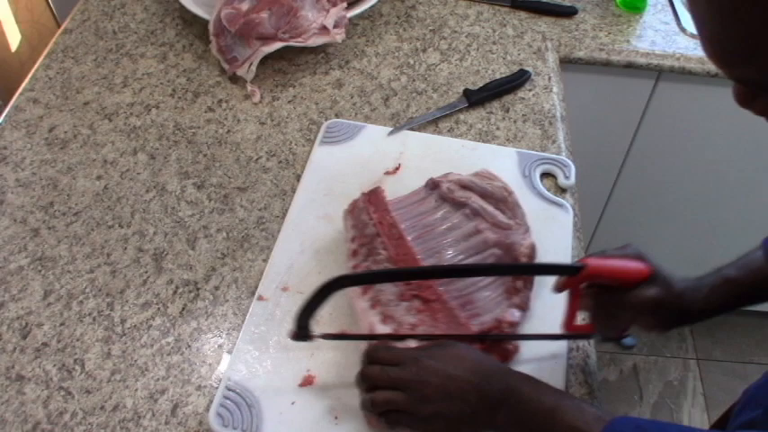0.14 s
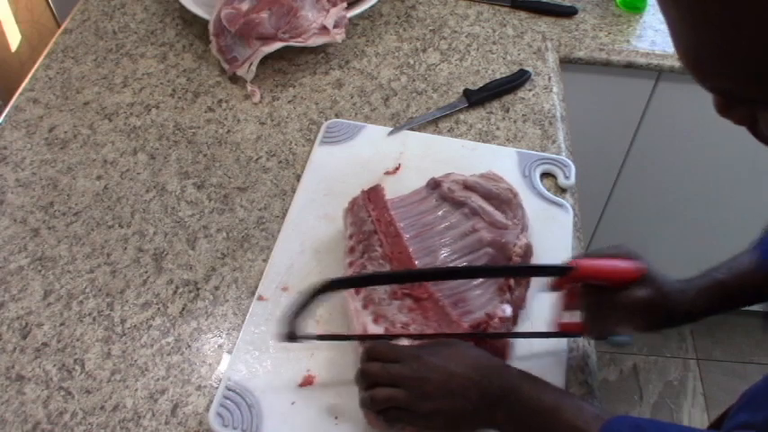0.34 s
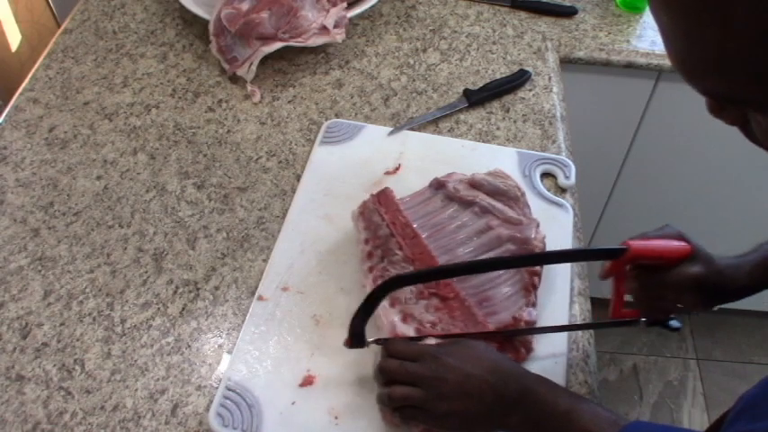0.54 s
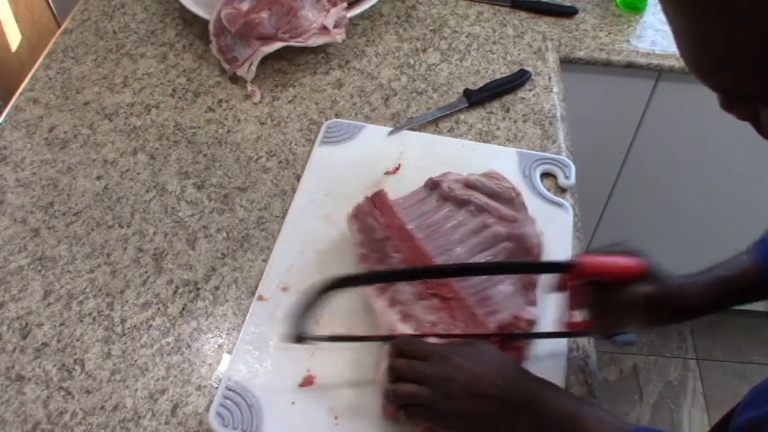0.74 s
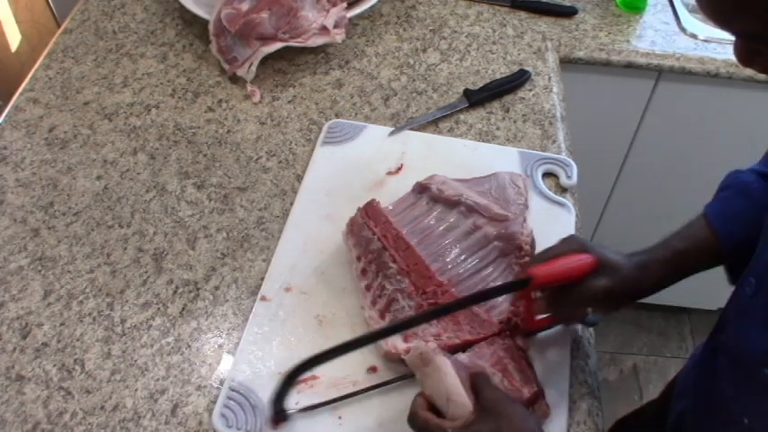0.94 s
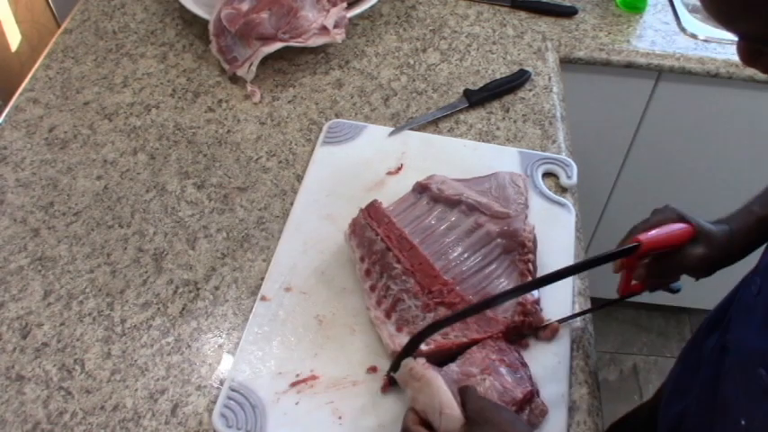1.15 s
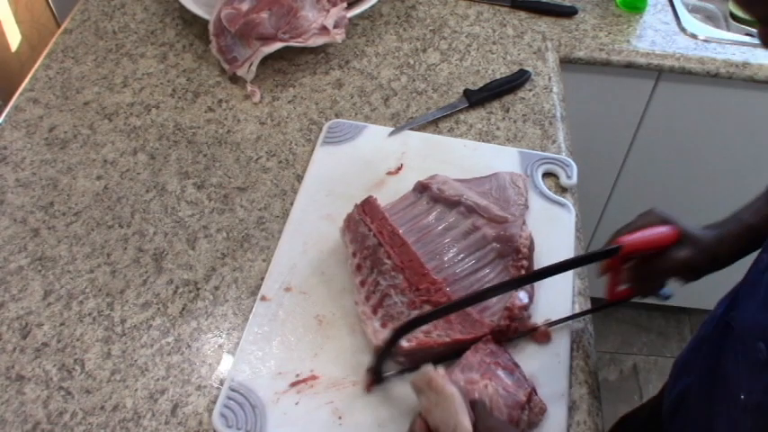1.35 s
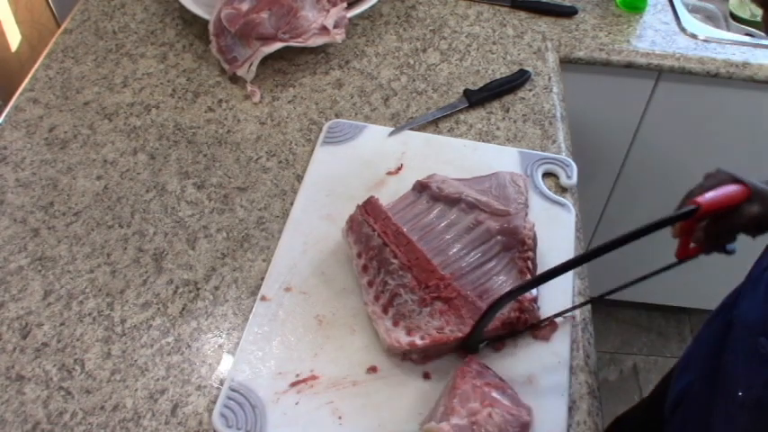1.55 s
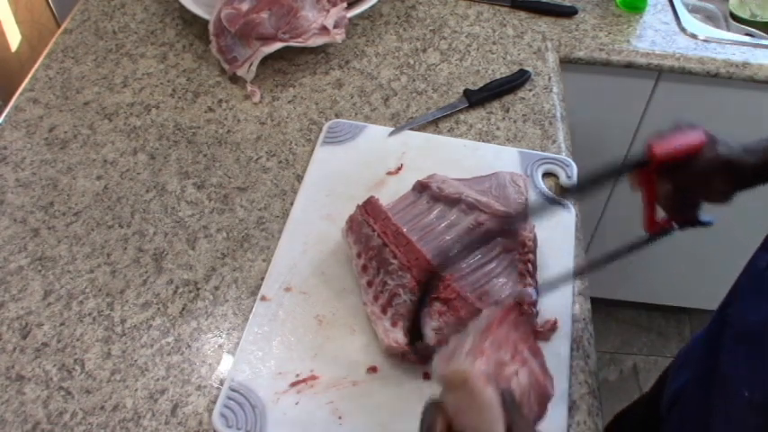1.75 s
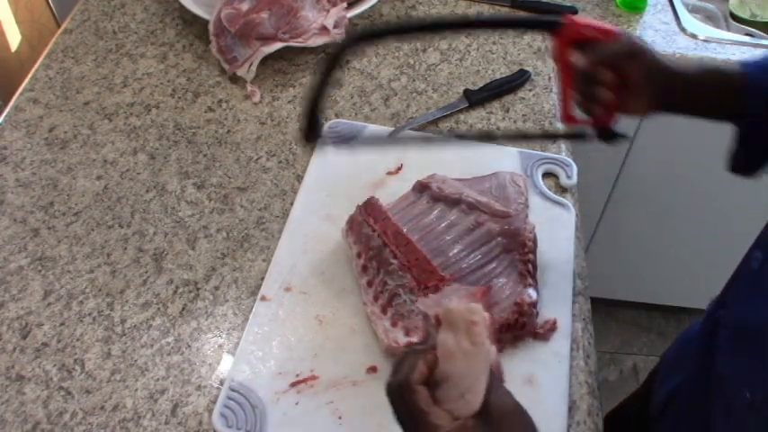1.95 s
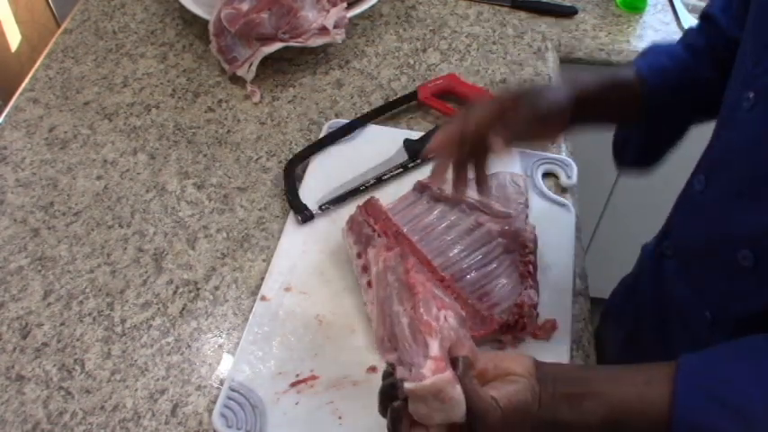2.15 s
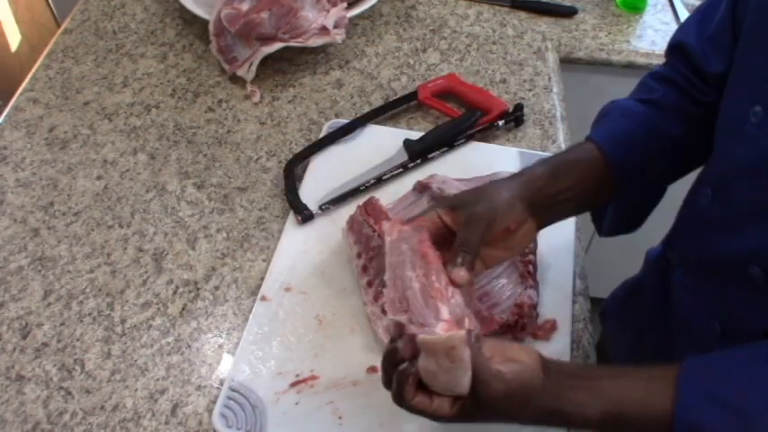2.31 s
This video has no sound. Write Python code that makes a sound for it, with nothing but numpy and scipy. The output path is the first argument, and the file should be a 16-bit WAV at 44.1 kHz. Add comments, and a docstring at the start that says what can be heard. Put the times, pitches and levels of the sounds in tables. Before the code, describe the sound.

A hacksaw rasps through bone in quick, gritty back-and-forth strokes with a rough buzzing tone until a hard edit at 0.8 s. From 0.95 to 1.6 s slower strokes scrape and knock hollowly on a plastic board, with wet meat snaps near 1.5 and 1.65. At 2.06 the saw drops, bouncing and rattling metallically until about 2.3, then faint meat handling. Close, bright kitchen echo, quiet room air.

```python
"""Hacksaw on bone and board

A hacksaw rasps quickly through bone in a hard kitchen: a rough tone at the tooth rate, with grit in step. A
hard edit leads to slower strokes whose teeth catch in a plastic board and drive its resonances. Short ticks and
touches, the saw's first landing among them, sound as decaying noise puffs. The dropped saw bounces as thuds,
cracks and ringing frame modes, with a dying rattle of random clicks. Room echo and coloured noise for air
surround it all."""
import sys
import numpy as np
from scipy import signal
from scipy.fft import rfft, irfft, next_fast_len
from scipy.io import wavfile

SR = 44100
rng = np.random.default_rng(int(sys.argv[2]) if len(sys.argv) > 2 else 0)


def to_wav(sig):
    """Store sig (one row per channel, or 1-D mono) as 16-bit WAV at the path in sys.argv[1].

    Samples outside -1..1 are clipped; the rate is SR.
    """
    pcm = np.clip(np.atleast_2d(sig), -1, 1) * 32767
    pcm = np.round(pcm).astype(np.int16)
    wavfile.write(sys.argv[1], SR, pcm.T)  # frames by channels


def natural_amplitude(level_db):
    """Convert a level in decibels to a linear amplitude factor, elementwise."""
    exponent = np.asarray(level_db, float) / 20
    return 10 ** exponent


N = 109191

# Spectrum of teeth on plastic. Each row: frequency in Hz, density in dB per Hz (relative).
SCRAPE_SPECTRUM = [(350, -44.5), (700, -14.5), (1100, -5.5), (2400, -12.5), (4700, -18.5), (8000, -16.5),
                   (11000, -34), (15600, -57)]
CATCHES_PER_S = 900   # teeth catching, clicks of equal size


def rms_one(x):
    """Scale to rms 1."""
    return x / np.sqrt(np.mean(x ** 2) + 1e-20)


def in_time(rows):
    """Columns of a table as curves over time, and a mask that is 1 inside the table."""
    s, *columns = np.transpose(rows)
    t = np.arange(N) / SR
    inside = (t >= s[0]) & (t <= s[-1])
    return [np.interp(t, s, c) for c in columns] + [inside]


def at_hz(points, hz):
    """Read a curve over frequency on a log axis."""
    f, v = np.transpose(points)
    return np.interp(np.log(hz + 1), np.log(f), v)


def colour(x, spectrum):
    """Give x a spectrum, causally (minimum phase, by folding the cepstrum); rms 1."""
    size = next_fast_len(2 * N)
    log_gain = at_hz(spectrum, np.arange(size // 2 + 1) * SR / size) * np.log(10) / 20
    cepstrum = irfft(log_gain, size)
    cepstrum[1:size // 2] *= 2
    cepstrum[size // 2 + 1:] = 0
    response = np.exp(rfft(cepstrum))
    return rms_one(irfft(rfft(x, size) * response, size)[:N])


def lowpass(x, order, hz):
    """Causal Butterworth low-pass."""
    return signal.sosfilt(signal.butter(order, hz, fs=SR, output="sos"), x)


def dull(x):
    """Hard clicks lose their top octave."""
    return lowpass(x, 3, 9920)


def drift(rate_hz):
    """Low-passed noise of rms 1: slow chance."""
    r = np.exp(-2 * np.pi * rate_hz / SR)
    noise = rng.standard_normal(N + SR)
    return rms_one(signal.lfilter([1], [1, -2 * r, r * r], noise)[SR:])


def resonate(x, hz, width_hz):
    """One two-pole resonance of gain 1 at its peak."""
    r = np.exp(-np.pi * width_hz / SR)
    poles = [1, -2 * r * np.cos(2 * np.pi * hz / SR), r * r]
    return signal.lfilter([(1 - r * r) / 2, 0, (r * r - 1) / 2], poles, x + 1e-18)


def body(x, peaks):
    """Parallel resonances of alternating sign; rms 1."""
    return rms_one(sum((-1) ** k * natural_amplitude(db) * resonate(x, hz, width_hz)
                       for k, (hz, width_hz, db) in enumerate(peaks)))


def ring(blows, hz, t60_s):
    """A unit click sets a decaying sine of height 1 ringing."""
    r, w = natural_amplitude(-60 / (t60_s * SR)), 2 * np.pi * hz / SR
    return signal.lfilter([0, np.sin(w)], [1, -2 * r * np.cos(w), r * r], blows + 1e-18)


def grains(per_s, spread_db):
    """Random clicks of either sign and uneven size."""
    size = natural_amplitude(spread_db * np.minimum(rng.exponential(1, N), 5)) * rng.choice([-1, 1], N)
    return size * (rng.random(N) < per_s / SR)


def clicks(s, db):
    """Clicks at given times."""
    out = np.zeros(N)
    np.add.at(out, (np.asarray(s) * SR).astype(int), natural_amplitude(np.asarray(db)))
    return out


def judder():
    """Random gain as the blade judders in the cut."""
    chatter_db, chatter_hz = 2.5, 70
    return natural_amplitude(chatter_db * drift(chatter_hz))


def rasp(gate, spectrum):
    """Grit under the teeth: clicks bunched by the gate, coloured, plus blade resonances; rms 1."""
    # Each row: frequency in Hz, width in Hz, level in dB.
    blade = [(1499, 46, 24), (2100, 460, 32.5), (5860, 67, -17), (7440, 650, 11)]
    blade_db, teeth_per_s, spread_db = -2, 9000, 1
    grit = grains(teeth_per_s * gate, spread_db) * judder()
    return rms_one(colour(grit, spectrum) + natural_amplitude(blade_db) * dull(body(grit, blade)))


def bone_strokes():
    """Teeth pass at an unsteady rate: a rough tone, an upper partial, and grit in step with them."""
    # Quick strokes. Each row: time in seconds, rasp in dB (before a 2 dB lift), tooth rate in Hz (before
    # jitter), tooth tone in dB, upper partial in dB (both before flutter).
    strokes = [(0, -27.5, 699.3, -25, -73), (.02, -20.5, 704.5, -19.5, -39), (.038, -25.5, 861.7, -12, -48),
               (.05, -32, 817, -26.5, -46), (.095, -39.5, 809.6, -36.5, -66), (.17, -46, 790.4, -40, -43),
               (.2, -31, 765.6, -30, -53), (.23, -28.5, 857, -30, -42), (.27, -36.5, 818.4, -37, -38),
               (.3, -39.5, 797, -39, -79), (.33, -25, 697.4, -33, -66), (.365, -21.5, 633.9, -33.5, -74),
               (.41, -29.5, 643.2, -37, -53), (.445, -44.5, 615.6, -48, -53), (.49, -30, 598.1, -33, -55),
               (.515, -24.5, 719.3, -28.5, -48), (.535, -28.5, 839.8, -28, -70),
               (.575, -36, 864.6, -37.5, -56), (.61, -31.5, 860, -37, -59), (.646, -22, 802.5, -45, -31),
               (.7, -26, 829.5, -30.5, -47), (.74, -42.5, 699.3, -75, -55), (.768, -24.5, 680, -29, -37),
               (.785, -29, 851.5, -17, -19), (.803, -20.5, 953.6, -28.5, -26.5),
               (.816, -27.5, 1004, -49, -62)]
    # Rasp spectrum. Each row: frequency in Hz, density in dB per Hz (relative).
    rasp_spectrum = [(90, -69), (160, -6), (380, -0.5), (670, 3.5), (1180, 2.5), (2000, 0.5), (3100, -4.5),
                     (7300, 0), (9500, -8.5), (12000, -25.5), (15600, -35.5)]
    # Saw frame under the tooth tone. Each row: frequency in Hz, width in Hz, level in dB.
    frame = [(680, 105, 0), (860, 89, 0)]
    rate_jitter, jitter_hz = .045, 250   # jitter is a share of the tooth rate
    flutter_db, flutter_hz = 4, 128
    upper_ratio = 2.12   # a little above the octave
    frame_db, rasp_lift_db, gate_depth = -7.5, 2, .5

    rasp_db, tooth_hz, tone_db, upper_db, on = in_time(strokes)
    phase = 2 * np.pi * np.cumsum(tooth_hz * (1 + rate_jitter * drift(jitter_hz))) / SR
    tone = natural_amplitude(tone_db) * np.sin(phase) + natural_amplitude(upper_db) * np.sin(upper_ratio * phase)
    tone = tone * np.sqrt(2) * natural_amplitude(flutter_db * drift(flutter_hz))
    frame_tone = natural_amplitude(tone_db + frame_db) * body(grains(CATCHES_PER_S, 0), frame)
    grit = natural_amplitude(rasp_db + rasp_lift_db) * rasp(1 + gate_depth * np.sin(phase), rasp_spectrum)
    return on * (tone + frame_tone + grit)


def plastic_scrape(soft_catches, mid_db):
    """Teeth scrape plastic: the top treble follows the board's load, and a narrow blade mode sings."""
    sheen_hz, sheen_follows = 9000, .4   # share of the board's dB
    sing_hz, sing_width_hz, sing_db = 1086, 14, -4
    scrape = rasp(0.6, SCRAPE_SPECTRUM)
    plain = signal.sosfiltfilt(signal.butter(2, sheen_hz, fs=SR, output="sos"), scrape)
    sheen = natural_amplitude(sheen_follows * (mid_db - mid_db.max())) * (scrape - plain)
    return plain + sheen + natural_amplitude(sing_db) * rms_one(resonate(soft_catches, sing_hz, sing_width_hz))


def board_strokes():
    """Teeth catch in the plastic and drive the board's resonances."""
    # Slow strokes. Each row: time in seconds, rasp in dB (before a 1 dB cut), board rumble in dB,
    # board mid in dB, lowest board modes in dB.
    strokes = [(0.95, -53, -65, -73, -52), (0.96, -35, -30.5, -51, -35), (0.984, -31, -18.5, -20.5, -16),
               (1.036, -17.5, -18.5, -14.5, -27.5), (1.1, -20.5, -17, -16.5, -29.5),
               (1.178, -34.5, -28.5, -32, -46), (1.212, -22.5, -40, -31, -46),
               (1.234, -22.5, -27.5, -25, -29.5), (1.286, -25, -32, -40, -45),
               (1.332, -44.5, -74, -74, -57), (1.352, -34.5, -32.5, -40, -30),
               (1.41, -21.5, -11, -13.5, -61), (1.458, -33.5, -15.5, -17.5, -32),
               (1.492, -28.5, -21.5, -20.5, -52), (1.596, -49, -50, -40, -43.5),
               (1.626, -44, -52, -40.5, -42), (1.644, -47, -37, -35.5, -44), (1.654, -45, -30, -55, -36),
               (1.708, -55, -72, -50, -70), (1.78, -66, -74, -75, -79)]
    # Low modes, the first two being the lowest. Each row: frequency in Hz, width in Hz, level in dB.
    low_modes = [(179.5, 27.5, 1.5), (215, 97, -1.5), (381.4, 37, -1), (433, 23.4, -1), (466.7, 20, 3.5),
                 (522, 41, -2)]
    # Broad body. Each row: frequency in Hz, density in dB per Hz (relative).
    mid_spectrum = [(350, -32), (600, 5), (736, 4.5), (871, 6.5), (1080, 4), (1380, -2), (2690, -19),
                    (5000, -25), (6500, -46), (11000, -120)]
    # Rings in the mid. Each row: frequency in Hz, width in Hz, level in dB.
    mid_rings = [(1052, 23, 12.8), (1370, 28, 17.7), (1530, 320, 4.5), (2430, 47, 3.8)]
    mid_rings_db, rasp_cut_db = -0.5, 1
    fading_hz, fading_width_hz, fading_db_at_1_s, fading_loss_db_per_s = 754, 32, -2, 20

    rasp_db, low_db, mid_db, lowest_db, on = in_time(strokes)
    catches = grains(CATCHES_PER_S, 0) * judder()
    soft = lowpass(catches, 2, 1800)
    mid = rms_one(colour(catches, mid_spectrum) + natural_amplitude(mid_rings_db) * body(soft, mid_rings))
    # one ring of the board fades steadily
    fading_db = fading_db_at_1_s - fading_loss_db_per_s * (np.arange(N) / SR - 1)
    mid = mid + on * natural_amplitude(fading_db) * rms_one(resonate(soft, fading_hz, fading_width_hz))
    board = natural_amplitude(low_db) * body(soft, low_modes[2:])
    board = board + natural_amplitude(lowest_db) * body(soft, low_modes[:2])
    board = board + natural_amplitude(mid_db) * mid
    return on * (board + natural_amplitude(rasp_db - rasp_cut_db) * plastic_scrape(soft, mid_db))


def saw_drop():
    """Each bounce: a thud and a crack; loose parts rattle on, dying; bounces and rattle strike the frame's modes."""
    # Bounces. Each row: time in seconds, thud in dB (before a low-pass), thud frequency in Hz, crack in dB.
    bounces = [(2.0564, -13.5, 357, -30), (2.081, -32, 1000, -23.5), (2.0858, 9, 1350, -19),
               (2.102, -15, 890, -28), (2.109, -2, 990, -38), (2.1124, 0, 990, -45),
               (2.128, -14, 1220, -47), (2.136, 0, 1100, -47), (2.181, -8, 418, -27),
               (2.21, -10.5, 360, -35)]
    # Frame modes. Each row: frequency in Hz, level in dB (relative), t60 in seconds.
    modes = [(271, -8, 0.08), (374, -7, 0.08), (1076, -14, 0.15), (1260, -9, 0.051), (1635, -10, 0.055),
             (3120, -12.5, 0.057), (5700, -28, 0.066), (5710, -12.5, 0.072), (6800, -30, 0.028),
             (6850, -9.5, 0.032)]
    # Rattle spectrum. Each row: frequency in Hz, density in dB per Hz (relative).
    rattle_spectrum = [(71, -56), (120, -49), (260, 5), (375, -7), (599, -5), (663, 11), (1060, 13),
                       (4600, -16.5), (7030, -2.5), (10100, -17), (12500, -34), (15600, -39)]
    thud_t60_cycles, crack_decay_s = 3.75, 0.02
    modes_db, blow_spread_db, rattle_blow_db = -26.5, 3.3, 5
    rattle_db, rattle_t60_s, rattle_per_s, rattle_spread_db = -14.5, 0.44, 5000, 3.4

    s, thud_db, thud_hz, crack_db = np.transpose(bounces)
    thuds = sum(ring(clicks([a], [db]), hz, thud_t60_cycles / hz)
                for a, db, hz in zip(s, thud_db, thud_hz))
    out = lowpass(thuds, 2, 2500)

    crack_fade = signal.lfilter([1], [1, -np.exp(-1 / (crack_decay_s * SR))], clicks(s, crack_db))
    out = out + crack_fade * dull(colour(rng.standard_normal(N), SCRAPE_SPECTRUM))

    since_s = np.arange(N) / SR - s[2]   # the rattle starts at the third bounce
    dying = (since_s > 0) * natural_amplitude(rattle_db - 60 * np.maximum(since_s, 0) / rattle_t60_s)
    loose = grains(rattle_per_s, rattle_spread_db)
    for hz, mode_db, t60_s in modes:
        blows = clicks(s, thud_db + rng.normal(0, blow_spread_db, len(s)))
        blows = blows + natural_amplitude(rattle_blow_db) * dying * loose
        out = out + natural_amplitude(mode_db + modes_db) * dull(dull(ring(blows, hz, t60_s)))
    return out + dying * colour(loose, rattle_spectrum)


def ticks_and_touches():
    """Short snaps and small touches, the saw's first landing among them: each a decaying puff of noise through
    one doubled resonance."""
    # Each row: start in seconds, nominal peak in dB, centre in Hz, t60 in seconds.
    snaps = [(0.151, -29, 2060, 0.1), (0.8758, -33.5, 7400, 0.003), (0.9413, -24.5, 1909, 0.004),
             (0.942, -28.5, 6000, 0.0027), (1.4983, -20.5, 6000, 0.017), (1.565, -40, 1260, 0.28),
             (1.6535, -32.5, 3290, 0.17), (1.6544, -32, 7300, 0.0031), (1.6536, -19.5, 2040, 0.015),
             (2.058, -17, 330, 0.12), (2.058, -34, 1960, 0.11), (2.367, -30, 2000, 0.0059),
             (2.407, -34.5, 9000, 0.0046), (2.4165, -29, 5170, 0.0056), (2.4595, -39, 7400, 0.014)]
    width_share = .07   # of the centre, at a t60 of 1 s; shorter snaps are broader
    out = np.zeros(N)
    t = np.arange(N) / SR
    for s, db, hz, t60_s in snaps:
        puff = (t > s) * natural_amplitude(db - 60 * np.maximum(t - s, 0) / t60_s) * rng.standard_normal(N)
        width_hz = hz * min(width_share / np.sqrt(t60_s), 1)
        snap = resonate(resonate(puff, hz, width_hz), hz, width_hz)
        out = out + snap * np.sqrt(SR / 4 / width_hz)   # make up for the narrow band
    return out


def meat_rustle():
    """Hands on meat: random clicks of uneven size, coloured, as a faint rustle."""
    # Each row: time in seconds, level in dB.
    handling = [(2.27, -51), (2.33, -45.5), (2.422, -46.5), (2.454, -66), (2.476, -66)]
    db, on = in_time(handling)
    return on * natural_amplitude(db) * colour(grains(1500, 2.9), SCRAPE_SPECTRUM)


def kitchen():
    """Impulse response of the room: direct sound, then noise dying band by band; deep bass cut."""
    # Each row: frequency in Hz, t60 in seconds.
    decay = [(120, 0.25), (300, 0.43), (1000, 0.23), (3000, 0.4), (8000, 0.17), (15000, 0.45)]
    echo_db, gap_s, low_cut_hz = -5, 0.0017, 180   # echo energy against the direct sound
    t = np.arange(int(.7 * SR)) / SR
    edges_hz = 100 * 2 ** np.arange(0, 7.6, .5)
    echo = np.zeros(len(t))
    for lo, hi in zip(edges_hz, edges_hz[1:]):
        band = signal.butter(2, [lo, hi], "band", fs=SR, output="sos")
        noise = signal.sosfilt(band, rng.standard_normal(len(t)))
        echo += noise * natural_amplitude(-60 * t / at_hz(decay, np.sqrt(lo * hi)))
    echo = echo * (t > gap_s)
    response = natural_amplitude(echo_db) * echo / np.sqrt(np.sum(echo ** 2))
    response[0] = 1
    response = response / np.sqrt(np.sum(response ** 2))
    return signal.sosfilt(signal.butter(6, low_cut_hz, "high", fs=SR, output="sos"), response)


def room_air():
    """Steady air of the room: coloured noise."""
    # Each row: frequency in Hz, density in dB per Hz (relative).
    air_spectrum = [(25, -42), (120, -18), (185, -24), (290, -5), (340, -19.5), (458, -8.5), (632, -12),
                    (743, -13), (2780, -27.5), (7720, -37), (15600, -60)]
    return natural_amplitude(-45.5) * colour(rng.standard_normal(N), air_spectrum)


def scene():
    """Two passages in the same room, joined by a hard edit, over the room's air."""
    edit_s = .8165   # cuts the first passage off, echo included
    room = kitchen()
    first = signal.fftconvolve(bone_strokes(), room)[:N] * (np.arange(N) < edit_s * SR)
    sources = board_strokes() + saw_drop() + ticks_and_touches() + meat_rustle()
    second = signal.fftconvolve(sources, room)[:N]
    return (first + second + room_air())[None]


def top_cut(x):
    """Nothing passes above the cut-off."""
    return signal.sosfilt(signal.butter(12, 15700, fs=SR, output="sos"), x)


def record(dry):
    """Peaks rounded by tanh, then bass and top cut."""
    ceiling, low_cut_hz, stop_hz = 1.93, 45, 16300
    x = ceiling * np.tanh(dry / ceiling)
    x = signal.sosfilt(signal.butter(2, low_cut_hz, "high", fs=SR, output="sos"), x)
    x = signal.sosfilt(signal.cheby2(10, 60, stop_hz, fs=SR, output="sos"), x)
    return top_cut(x)


dry = scene()
out = record(dry)
to_wav(out)
```